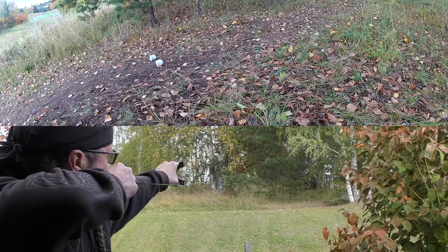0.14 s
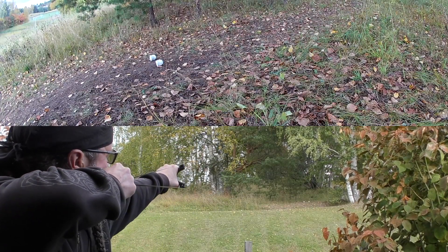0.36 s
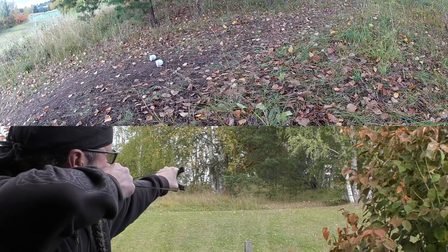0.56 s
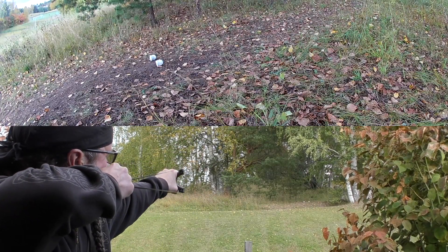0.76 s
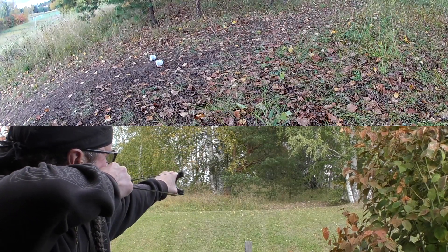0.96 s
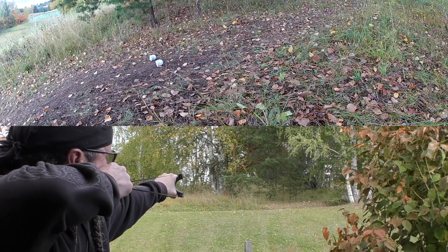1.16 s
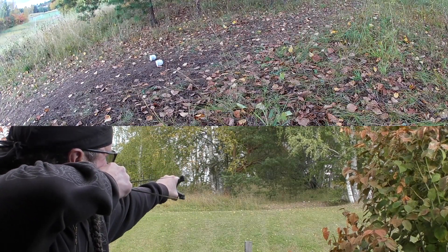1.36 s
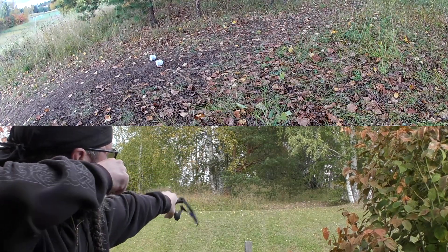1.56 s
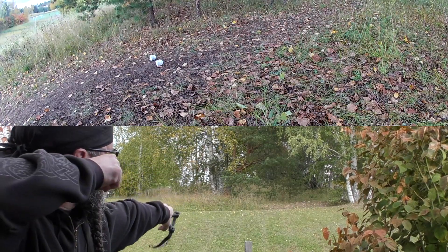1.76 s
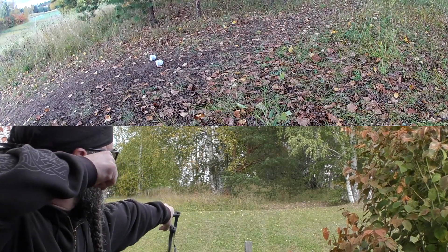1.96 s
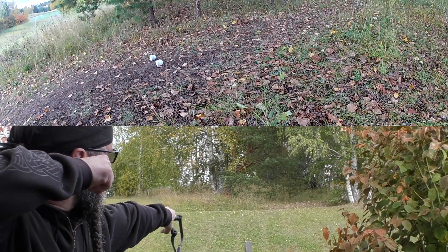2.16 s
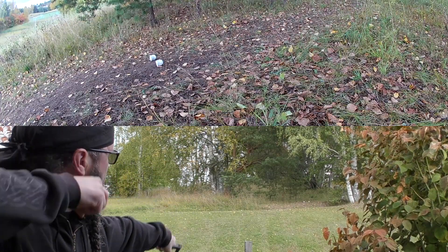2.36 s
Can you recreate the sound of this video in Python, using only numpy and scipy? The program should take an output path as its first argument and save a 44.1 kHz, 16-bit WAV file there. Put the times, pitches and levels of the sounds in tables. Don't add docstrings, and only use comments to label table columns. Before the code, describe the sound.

Slingshot release: one loud bright rubber snap outdoors, followed by a fainter hollow knock and leaf spray.

```python
import sys
import numpy as np
from scipy import signal
from scipy.fft import rfft, irfft, next_fast_len
from scipy.io import wavfile
from scipy.ndimage import uniform_filter1d, map_coordinates

SR = 44100
rng = np.random.default_rng(int(sys.argv[2]) if len(sys.argv) > 2 else 0)


def natural_amplitude(level_db):
    exponent = np.asarray(level_db, float) / 20
    return 10 ** exponent


def digitize_waveform(pressure):
    field = np.atleast_2d(pressure).T
    bounded = np.clip(field, -1, 1)
    quanta = np.round(bounded * 32767).astype(np.int16)
    wavfile.write(sys.argv[1], SR, quanta)


N = 106369


def unit(x):
    return x / np.sqrt(np.mean(x ** 2) + 1e-20)


def along(points, hz):
    f, v = np.transpose(points)
    return np.interp(np.log(hz + 1), np.log(f + 1), v)


def wobble(rate_hz):
    return map_coordinates(rng.standard_normal(2000), [np.arange(N) * rate_hz / SR])


def filtered(x, response):
    m = next_fast_len(x.shape[-1] + 8192)
    return irfft(rfft(x, m) * response(np.fft.rfftfreq(m, 1 / SR)), m)[..., :x.shape[-1]]


def resonance(f, center_hz, width):
    damping = 1j * f * width * center_hz
    return damping / (center_hz ** 2 - f ** 2 + damping)


def rush(spectrum, side_db, patchy_db):
    z = signal.stft(rng.standard_normal((2, N)), nperseg=512)[2]
    field = uniform_filter1d(rng.standard_normal(z.shape[1:]), size=6, axis=0)
    field = uniform_filter1d(field, size=10, axis=1)
    pair = signal.istft(z * natural_amplitude(patchy_db * unit(field)), nperseg=512)[1][:, :N]
    closed = [(spectrum[0][0] / 2, -60)] + list(spectrum)
    mid, side = filtered(pair, lambda hz: natural_amplitude(along(closed, hz) + [0 * hz, along(side_db, hz)]))
    return unit(np.array([mid + side, mid - side]))


def fade(start_s, rise_s, hold_s, t60):
    t = np.maximum(np.arange(N) / SR - start_s, 0)
    return (1 - np.exp(-t / rise_s)) * natural_amplitude(-60 * np.maximum(t - hold_s, 0) / t60)


def pops(rows):
    t = np.arange(N) / SR
    out = np.zeros(N)
    for start_s, db, hz, t60 in rows:
        ring = np.sin(2 * np.pi * hz * (t - start_s))
        out += natural_amplitude(db) * fade(start_s, 0.54 / hz, 0, t60) * ring
    return out


def cracks(rows):
    out, t = np.zeros((2, N)), np.arange(4096) / SR
    for start_s, db, hz, t60 in rows:
        noise = rng.standard_normal((2, len(t)))
        mid, side = filtered(noise, lambda f: resonance(f, hz, width=0.91))
        side = 0.4 * side
        shape = natural_amplitude(db - 3 - 60 * t / t60) * (1 - np.exp(-t / 0.0004))
        out[:, round(start_s * SR):][:, :len(t)] += shape * unit(np.array([mid + side, mid - side]))
    return out


# pitch_hz, level_db (per Hz)
AIR_TONE = [(150, -1), (300, -5), (800, -8), (1300, -8.5), (3200, -20.5), (7500, -28.5), (12500, -30),
            (15800, -28.5)]
# pitch_hz, level_db (per Hz)
WIND_TONE = [(13, -38), (22, -3), (54, 3), (107, -2), (250, -9.5), (350, -13), (460, -38.5), (770, -120)]
# pitch_hz, side_over_mid_db
AIR_SPREAD = [(60, -16), (130, -11), (290, -13), (640, -15), (1410, -8.5), (3100, -3), (6820, -4.5),
              (15000, -5)]


def air():
    trees = natural_amplitude(-54 + 0.5 * wobble(2.4)) * rush(AIR_TONE, AIR_SPREAD, patchy_db=0.87)
    lumps = natural_amplitude(0.6 * wobble(25))
    wind = rush(list(WIND_TONE) + [(700, -44)], AIR_SPREAD, patchy_db=0)
    return trees + natural_amplitude(-58.5) * unit(lumps * wind)


# time_s, pitch_hz, level_db
WHISTLE = [(.72, 4620, -82), (.79, 4570, -71), (.84, 4550, -71), (.89, 4510, -69), (.94, 4490, -75),
           (.98, 4450, -92)]
# start_s, level_db, pitch_hz, t60_s
CHIRP_HITS = [
    (.885, -63, 3550, .06),
    (1.19, -60, 3470, .08),
]


def birds():
    time_s, hz, db = np.transpose(WHISTLE)
    t = np.arange(N) / SR
    level = natural_amplitude(np.interp(t, time_s, db, -140, -140) + 1.5 * wobble(40))
    phase = 2 * np.pi * np.cumsum(np.interp(t, time_s, hz)) / SR
    return level * np.sin(phase) + pops(CHIRP_HITS)


# start_s, level_db, center_hz, t60_s
SLAP_HITS = [
    (1.4268, -27, 3990, 0.0094),
    (1.4390, -9, 11000, .005),
    (1.4432, -11.5, 12000, .012),
    (1.4458, -4.5, 8400, 0.013),
    (1.4482, -11, 7000, .015),
    (1.4530, -10, 5800, .02),
    (1.4585, -13.5, 8500, .025),
    (1.4672, -14.5, 7950, .015),
]


def slaps():
    return cracks(SLAP_HITS)


# start_s, level_db, pitch_hz, t60_s
POP_HITS = [(1.4268, -17.5, 1250, .004), (1.4270, -25, 2200, 0.0069), (1.4275, -25.5, 287, 0.033),
            (1.4380, -2, 1700, .0045), (1.4399, -6, 1350, .009), (1.4395, -12, 493.5, 0.017),
            (1.4395, -11, 270, .025), (1.4428, -10, 2130, .005), (1.4440, -23, 80, .08),
            (1.4440, -14, 190, .03), (1.4600, -19, 290, .025), (1.5648, -29, 556, .022),
            (1.5640, -37.5, 160, .05), (1.5670, -45, 2480, 0.011), (1.5740, -35, 485, 0.023),
            (1.5840, -39.5, 445, .02), (1.6060, -36, 400, 0.014), (1.6320, -45.5, 250, .02)]


def fork_pops():
    return pops(POP_HITS)


# start_s, level_db, center_hz
CLICK_HITS = [
    (1.4271, -16, 9000),
    (1.43935, 0, 10000),
    (1.43945, 3, 14000),
    (1.4396, -3, 6500),
    (1.43975, 0, 10000),
    (1.4402, -6, 4700),
    (1.4431, -10, 3500),
    (1.4440, -5, 14000),
    (2.0255, -47, 8000),
]


def clicks():
    width, lag_s = 0.3, 0.000012
    start_s, db, hz = np.transpose(CLICK_HITS)[..., None]

    def response(f):
        level = natural_amplitude(db) * SR / (np.pi * width * hz)
        delay = np.exp(-2j * np.pi * f * start_s)
        ports = np.exp(1j * np.pi * f * lag_s * np.array([[1], [-1]]))
        return (level * resonance(f, hz, width) * delay).sum(0) * ports

    return filtered(np.eye(1, N), response)


def band_motion():
    t = np.arange(N) / SR
    start_s, slap_s = 1.4275, 1.4385
    swish = natural_amplitude(-24.5 + 1799.5 * np.minimum(t - slap_s, 0))
    swish = swish * (t > start_s) * (t < slap_s)
    flap = natural_amplitude(-13.5 + 2 * wobble(300)) * fade(slap_s, rise_s=0.004, hold_s=0.008, t60=0.16)
    return swish + flap


# pitch_hz, side_over_mid_db
SNAP_SPREAD = [(60, 0), (150, -8), (450, -3.5), (950, -3.5), (2380, -4), (5980, -8), (15000, -4)]
# pitch_hz, level_db (per Hz)
RUBBER_TONE = [(710, -22.5), (1200, 0.5), (2060, -8), (2970, -3.5), (3970, -5.5), (8640, -1.5), (11800, -6),
               (15800, -15)]


def rubber(motion):
    return motion * rush(RUBBER_TONE, SNAP_SPREAD, patchy_db=0.6)


# pitch_hz, level_db (per Hz)
FLOP_TONE = [(120, -6), (250, 1), (450, -1.5), (750, -13), (1200, -6.5), (2000, -10.5), (3000, -26.5),
             (5000, -61)]


def flop():
    shape = natural_amplitude(-24.5) * fade(1.4385, rise_s=0.0026, hold_s=0.0074, t60=0.12)
    return shape * rush(FLOP_TONE, SNAP_SPREAD, patchy_db=-0.5)


# pitch_hz, level_db (per Hz)
SCATTER_TONE = [(300, -12), (1000, -8.5), (3000, -3), (7000, -2.5), (12000, -7), (15800, -17.5)]


def scatter():
    shape = natural_amplitude(-41) * fade(1.4385, rise_s=0.019, hold_s=0.06, t60=0.415)
    return shape * rush(SCATTER_TONE, SNAP_SPREAD, patchy_db=1.6)


# start_s, level_db, pitch_hz, t60_s
KNOCK_HITS = [(1.8205, -22.5, 795, 0.0099), (1.8247, -23, 700, 0.0088), (1.8260, -29, 1300, 0.0069),
              (1.8290, -27, 800, .008), (1.8328, -35, 550, 0.011), (1.8373, -10.5, 700, .012),
              (1.8375, -22, 480, .012), (1.8378, -25, 1120, 0.0082), (1.8401, -25, 1000, .012),
              (1.8445, -34, 560, 0.014), (1.8475, -32, 700, 0.021), (1.8670, -42, 800, .02)]


def knocks():
    return pops(KNOCK_HITS)


# pitch_hz, side_over_mid_db
HIT_SPREAD = [(180, -14), (550, -26), (1650, -10), (4970, -8.5), (15000, -7)]
# pitch_hz, level_db (per Hz)
SPRAY_TONE = [(800, -2), (2000, -6), (3500, 0), (5000, -2), (7000, 1), (10000, -5), (13000, -10),
              (15800, -26)]


def spray():
    start_s, hold_s = 1.823, 0.033
    burst = fade(start_s, rise_s=0.0024, hold_s=hold_s, t60=0.21)
    tail = natural_amplitude(-12.5) * fade(start_s, rise_s=hold_s, hold_s=hold_s, t60=0.73)
    shape = natural_amplitude(-47.5 + 1.3 * wobble(200)) * (burst + tail)
    return shape * rush(SPRAY_TONE, HIT_SPREAD, patchy_db=0)


# start_s, level_db, center_hz, t60_s
LEAF_HITS = [
    (1.8245, -46, 2800, .06),
    (1.836, -46, 3500, .04),
    (2.132, -57.5, 8400, .05),
    (2.035, -57, 6000, 0.047),
]


def leaves():
    return cracks(LEAF_HITS)


# pitch_hz, level_db (per Hz)
THUD_TONE = [(300, -11), (500, 2), (800, -0.5), (1300, -5.5), (2000, -27), (3000, -42)]


def thud():
    shape = natural_amplitude(-40) * fade(1.836, rise_s=0.002004, hold_s=0.0093, t60=0.073)
    return shape * rush(THUD_TONE, HIT_SPREAD, patchy_db=0.5)


def scene():
    motion = band_motion()
    low = flop()
    echo = scatter()
    snap = rubber(motion) + low + slaps() + fork_pops()
    snap = snap * natural_amplitude([[0.54], [-0.54]])
    hit = knocks() + spray() + thud() + leaves()
    return snap + echo + clicks() + hit + birds() + air()


def band_limit(x):
    return signal.sosfilt(signal.butter(12, 16280, fs=SR, output="sos"), x)


# pitch_hz, level_db
PORT_LOSS = [(450, -1), (700, -12.5), (1000, -1), (5500, -1), (6600, -8.5), (7400, -25.5), (8200, -7.5),
             (10000, -1)]


def record(dry):
    side = filtered((dry[0] - dry[1]) / 2, lambda hz: natural_amplitude(along(PORT_LOSS, hz)))
    pair = dry.mean(0) + np.array([side, -side])
    clipped = pair / (1 + np.abs(pair / 1.1) ** 8) ** (1 / 8)
    mix = filtered(clipped, lambda hz: np.clip((15900 - hz) / 200, 0, 1))
    return band_limit(mix)


dry = scene()
out = record(dry)
digitize_waveform(out)
```